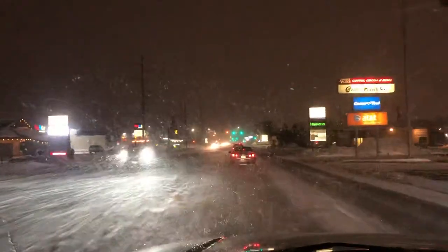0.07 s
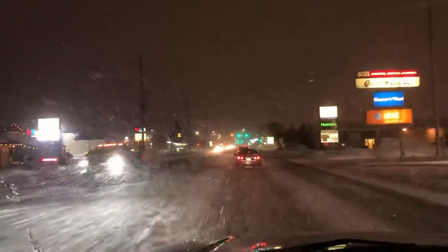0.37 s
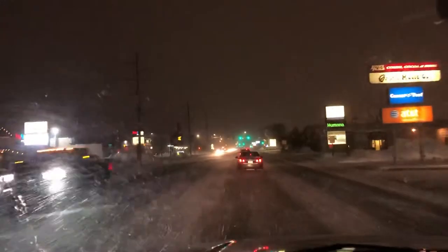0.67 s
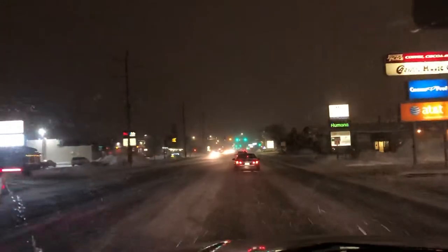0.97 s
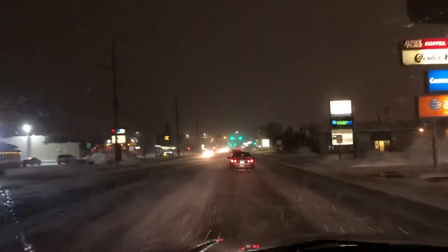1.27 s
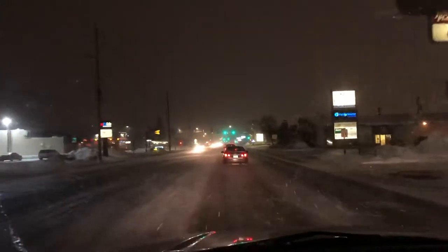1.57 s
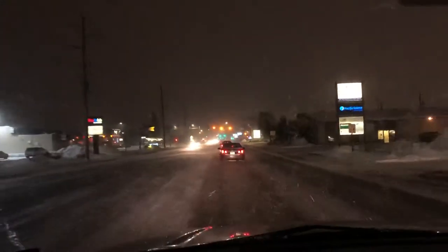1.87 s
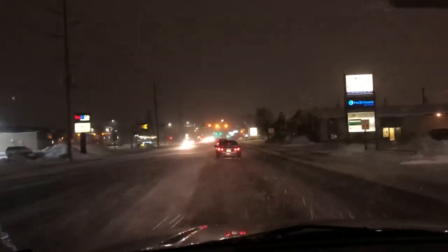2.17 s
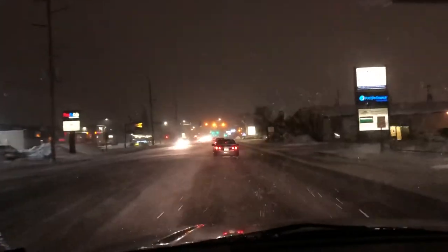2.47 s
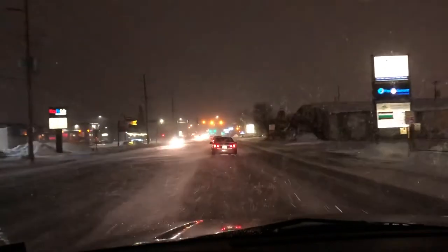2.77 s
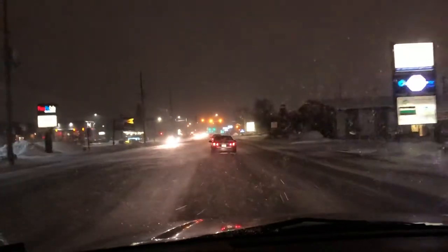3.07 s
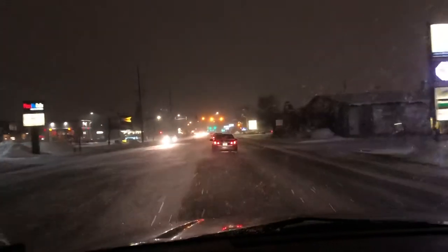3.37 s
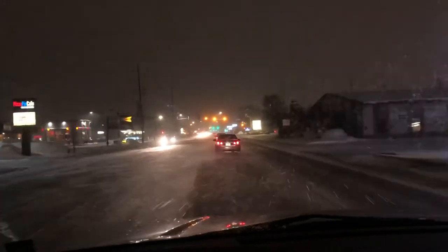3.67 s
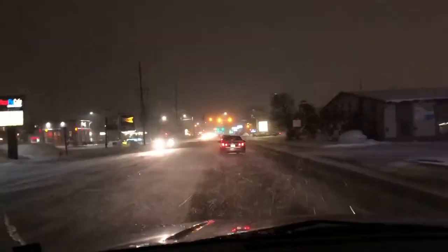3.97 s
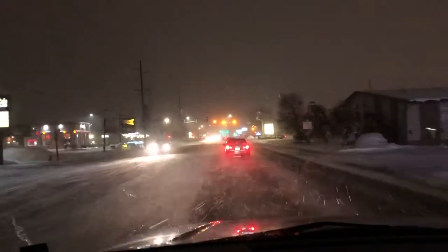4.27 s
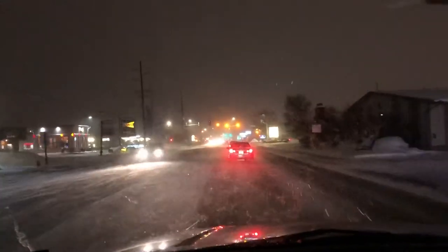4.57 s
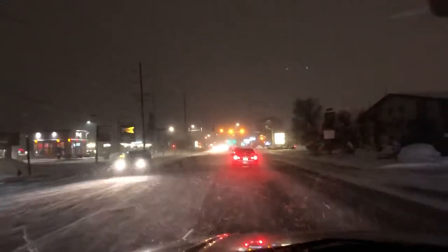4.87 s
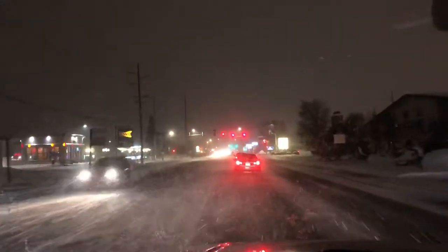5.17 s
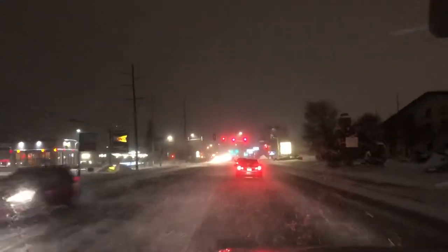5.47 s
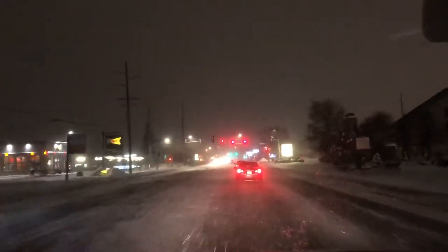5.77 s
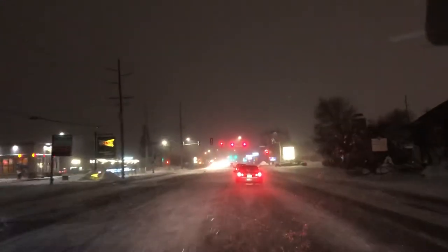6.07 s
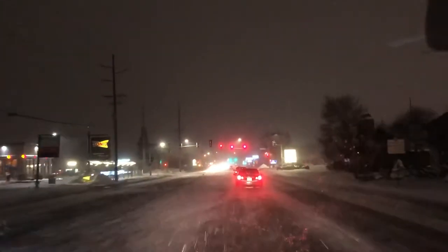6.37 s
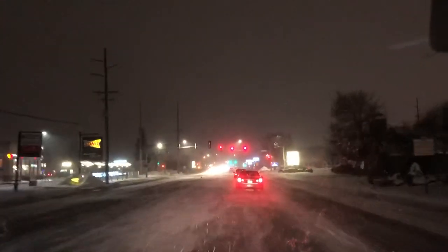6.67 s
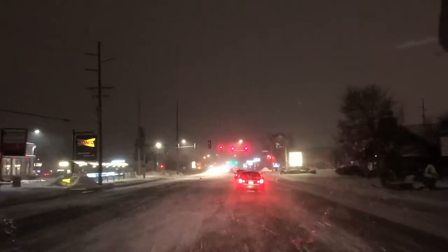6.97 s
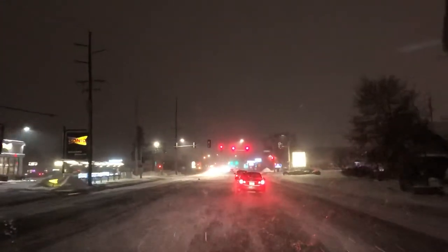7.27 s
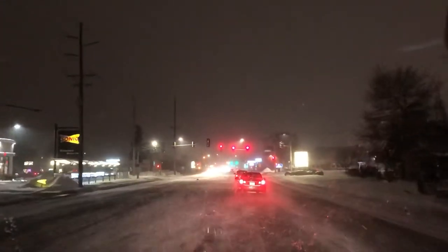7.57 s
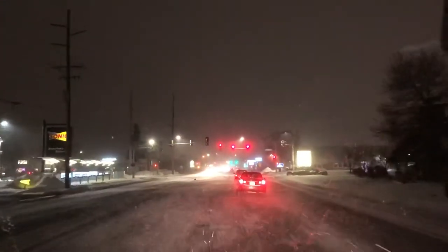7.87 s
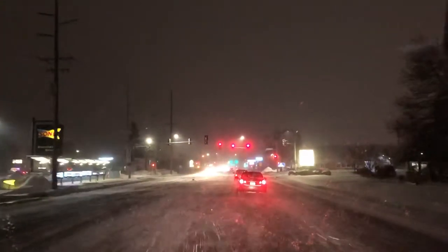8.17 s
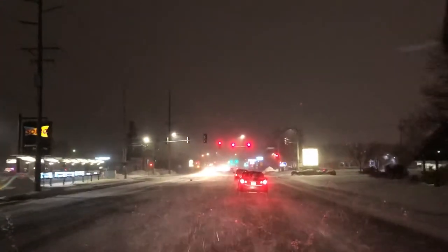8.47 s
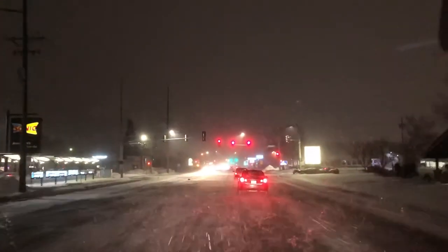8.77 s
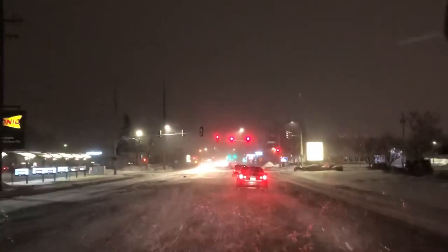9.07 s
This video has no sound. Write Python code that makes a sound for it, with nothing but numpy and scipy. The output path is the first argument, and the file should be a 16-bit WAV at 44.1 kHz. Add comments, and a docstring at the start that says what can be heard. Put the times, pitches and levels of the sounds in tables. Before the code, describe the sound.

Heard from the front seat of a moving car, the engine hums under a deep, slightly throbbing road rumble. Soft tyre noise and a quiet heater hiss sit behind it, while ruts in the snow make short, muffled booms. The car gradually slows without stopping, so the hum drops a little in pitch. Faint flicks of slush and tiny ticks of loose plastic grow more frequent near the end.

```python
"""Car cabin on a snowy road.

The car rolls along, then eases off for a red light. Engine and drivetrain drone; the uneven road
shakes the cabin's air modes and panels, and ruts set it booming. The tyres roar, the heater fan
hisses, slush sprays faintly against the body and loose trim ticks."""
import sys
import numpy as np
from scipy import signal
from scipy.fft import rfft, irfft
from scipy.io import wavfile
from scipy.ndimage import uniform_filter1d

SR = 44100
rng = np.random.default_rng(int(sys.argv[2]) if len(sys.argv) > 2 else 0)


def dump(signal):
    """Clip the signal to [-1, 1] and save it as 16-bit WAV at the path in sys.argv[1]."""
    limited = np.clip(np.atleast_2d(signal).T, -1, 1)
    pcm = np.round(limited * 32767).astype(np.int16)
    wavfile.write(sys.argv[1], SR, pcm)


N = 411453
T = np.arange(N) / SR
FREQS_HZ = np.maximum(np.fft.rfftfreq(N, 1 / SR), 1)

# road speed (time [s], share of top speed)
ROAD_SPEED = [(0, 0.97), (1.5, 0.97), (2, 1), (2.8, 1.0), (4.4, 1), (5.8, .91), (7, 0.83), (9.33, 0.76)]
# engine note and upper drivetrain drone (time [s], pitch [Hz], level [dB])
ENGINE_TRACK = [(0, 83.9, -37.5), (.4, 85.4, -29.5), (1.4, 94.4, -36.5), (1.8, 103.6, -38),
                (2.3, 108.6, -33.5), (3.1, 91.98, -37), (3.78, 88.05, -28), (4.05, 88.1, -47),
                (4.72, 90, -32), (5.1, 88.1, -43.5), (5.8, 88.1, -33.5), (6.4, 90.03, -37),
                (6.6, 90.26, -25), (6.9, 90.1, -45), (7.55, 91.5, -32.5), (8.05, 87.3, -35.5),
                (8.25, 80.8, -40), (8.5, 76.9, -34), (9.33, 74, -31)]
DRIVETRAIN_TRACK = [(0, 136.5, -43.5), (.55, 142.8, -34.5), (1.3, 151, -32), (1.5, 148.9, -48),
                    (1.65, 138.1, -36), (2.05, 147, -27.5), (2.35, 151.1, -37.5), (2.65, 146.3, -29.5),
                    (2.9, 144.4, -45), (3.75, 141.7, -34), (4.05, 140, -47), (5.1, 130, -45),
                    (6, 137.1, -32.5), (6.6, 130.1, -40), (7, 128, -45.5), (9.33, 120, -40)]
# wheel hums at top speed (pitch [Hz], level [dB])
WHEEL_HUMS = [(116, -40), (127, -35)]
# resonances (frequency [Hz], nominal width [Hz], relative level [dB])
CABIN_AIR_MODES = [(33, 10, -8.5), (43.4, 9.9, -9), (56.5, 14, -9), (69.6, 8.8, -6.5), (75.8, 17.4, -4),
                   (89.3, 10.4, -3)]
BODY_PANEL_MODES = [(115.2, 11.5, 3), (131.3, 6.7, 0), (138.2, 23, 0.5), (148, 15, -3.5), (162, 16, -10.5),
                    (183, 24, -15.5)]
TREAD_MODES = [(457, 13, -11), (529.5, 35, -9), (605, 26, -11.5), (742, 116, -12.5), (952, 96, -17),
               (1300, 120, -24)]
CARCASS_AND_WELL_MODES = [(188.7, 32, 2), (234.6, 53, -0.5), (294.2, 49, 0.5), (343, 33, -5), (380, 38, -3)]
HEATER_DUCT_MODES = [(1627, 40, 4), (1738, 49, 6), (1820, 56, -4), (2260, 120, -14), (3520, 140, -10),
                     (3590, 25, -11), (4020, 22, -6)]
# noise spectra in the cabin (frequency [Hz], relative density [dB])
TREAD_SPECTRUM = [(380, -10.5), (450, -11.5), (600, -14.5), (850, -16), (1130, -23.5), (1450, -24),
                  (2000, -32), (3500, -39)]
VENT_SPECTRUM = [(400, 1), (1000, 4.5), (1500, -1), (1950, 0), (2300, 1), (2900, -2), (3600, -2),
                 (4900, -7), (6500, -10.5), (9000, -14.5), (10000, -18.5), (13000, -21.5), (15500, -24)]
SLUSH_SPECTRUM = [(4000, 6), (6000, 7), (9000, 1.5), (12000, -2.5), (15500, -1.5)]
# ruts under the wheels (onset [s], boom peak [dB], boom pitch [Hz], rise [s])
RUTS = [(.2, -23, 81.5, 0.015), (1.535, -20, 95, 0.016), (1.93, -22, 93, 0.011), (3.2, -23.5, 80.6, 0.016),
        (3.275, -20.5, 81.1, 0.012), (3.775, -21, 85, .016), (4.025, -24, 83, .012),
        (4.22, -23.5, 110, .012), (4.53, -22, 81.5, 0.0099), (4.72, -20.5, 91, 0.017),
        (5.21, -23, 108, 0.011), (6.585, -20, 90.5, 0.026), (6.83, -24.5, 86.7, 0.013),
        (7.223, -24, 90.8, 0.0097), (7.905, -17.5, 87.3, 0.012), (8.025, -21.5, 80, 0.014),
        (8.099, -23.5, 81, .013), (8.38, -19.5, 81, 0.01), (8.618, -21.5, 79, .016), (8.89, -20, 76, 0.015)]
# larger slush sprays (peak time [s], relative level [dB], nominal half length [s], low edge [Hz])
SLUSH_SPRAYS = [(.525, -67, .045, 5000), (.774, -68, 0.0098, 10000), (.888, -66.5, .014, 8000),
                (1.352, -68, 0.011, 4005), (1.793, -68, .011, 10000), (1.907, -65, 0.011, 6000),
                (2.16, -66, .0092, 11000), (2.275, -65, .015, 8010), (2.743, -68, 0.011, 11020),
                (2.923, -70, .022, 8000), (3.135, -69, .02, 8000), (3.358, -68, .012, 4995),
                (3.608, -69, .012, 7010), (5.084, -66.5, 0.018, 6000), (5.141, -68, .015, 4000),
                (5.208, -66, .012, 4000), (5.516, -68, .014, 3993), (6.14, -64.5, 0.0071, 6000),
                (6.214, -66, 0.013, 6000), (6.369, -68, .011, 10000), (6.513, -65.5, 0.013, 3000),
                (7.338, -63.5, 0.022, 5980), (7.645, -63.5, .0096, 7000), (8.218, -68, 0.011, 8000),
                (8.313, -68, 0.011, 9000), (8.378, -64, 0.014, 4000), (8.468, -63, .012, 3000),
                (8.633, -68, .015, 4000), (8.76, -66, .035, 5000), (8.82, -67, .01, 7000),
                (8.884, -66.5, .02, 3000), (8.945, -67, 0.017, 3990), (9.067, -63, .0085, 3000),
                (9.135, -59.5, .026, 3990)]
# trim ticks (onset [s], pitch [Hz], relative level [dB], decay [s], nominal width / pitch)
TRIM_TICKS = [(3.101, 14000, -58, .004, .07), (3.099, 3800, -58, 0.0092, .5), (3.682, 5000, -58, .0093, .3),
              (4.358, 5480, -61.5, .008, .35), (4.36, 9910, -67, .009, 0.13), (7.082, 4380, -63, .04, 0.31),
              (7.335, 5170, -60, .011, .4), (8.425, 4500, -60, .014, .5), (8.503, 2894, -56, .009, .3),
              (8.87, 2500, -57, .016, .4), (9.112, 4600, -61, 0.023, .7)]


def undb(db):
    """Decibels to gain."""
    return 10 ** (np.asarray(db) / 20)


def unit(x):
    """Scale to rms 1."""
    return x / np.sqrt(np.mean(x ** 2))


def curve(rows):
    """Interpolate each column linearly over time."""
    times_s, *columns = np.transpose(rows)
    return [np.interp(T, times_s, column) for column in columns]


def noise(gain):
    """Spectrally shaped noise, rms 1."""
    return unit(irfft(rfft(rng.standard_normal(N)) * gain, N))


def colour(spectrum):
    """Gain through the spectrum's points, steep roll-off beyond both ends."""
    hz, db = np.transpose(spectrum)
    ends = np.minimum(FREQS_HZ / hz[0], 1) * np.minimum(hz[-1] / FREQS_HZ, 1)
    return undb(np.interp(np.log(FREQS_HZ), np.log(hz), db)) * ends ** 3


def resonances(modes, skirt):
    """Gain of independently driven modes; a larger skirt deepens the valleys."""
    power = 0
    for hz, width_hz, db in modes:
        detuning = (FREQS_HZ / hz - hz / FREQS_HZ) * hz / width_hz
        power += undb(db) ** 2 / (1 + detuning ** 2) ** skirt
    return np.sqrt(power)


def wander(rate_hz):
    """Random drift, rms 1."""
    return noise(1 / (1 + (FREQS_HZ / rate_hz) ** 4))


def speed():
    """Share of top speed over time."""
    return curve(ROAD_SPEED)[0]


def speed_level_db(top_db, db_per_decade):
    """Level that grows with road speed."""
    return top_db + db_per_decade * np.log10(speed())


def churn(time_s, start_s=8.39, rise_s=0.35):
    """Churned snow before the junction, 0 to 1."""
    return np.clip((time_s - start_s) / rise_s, 0, 1)


def drone(hz, db, drift_hz=0.3, drift_db=1.1):
    """One rotating order: a sine wavering in pitch and level with the load."""
    phase = 2 * np.pi * np.cumsum(hz + drift_hz * wander(6)) / SR
    return undb(db + drift_db * wander(6)) * unit(np.sin(phase))


def wheel_hum():
    """Two hums locked to the wheels, audible only near top speed."""
    return sum(drone(hz * speed(), speed_level_db(db, db_per_decade=398)) for hz, db in WHEEL_HUMS)


def road_rumble(modes, db, skirt, smooth_s=0.09):
    """Rough snow shakes a set of modes; random swells are levelled out."""
    shake = noise(resonances(modes, skirt))
    window = int(smooth_s * SR)
    power = uniform_filter1d(uniform_filter1d(shake ** 2, window), window)
    return shake / np.sqrt(power + 1e-12) * undb(db)


def wheel_throb(depth_db=1.4, top_turn_hz=10.5):
    """Rumble gain: snow-caked wheels thump once a turn."""
    turns = np.cumsum(top_turn_hz * speed()) / SR + rng.random()
    return undb(depth_db * np.cos(2 * np.pi * turns))


def tyres(roar_flutter_db=0.5, growl_flutter_db=0.46):
    """Tread roars on packed snow, carcasses growl; both sink with speed."""
    roar_db = speed_level_db(-47.5, db_per_decade=31) + roar_flutter_db * wander(17)
    growl_db = speed_level_db(-42.5, db_per_decade=26) - growl_flutter_db * wander(12)
    tread = noise(np.hypot(colour(TREAD_SPECTRUM), resonances(TREAD_MODES, skirt=1.23)))
    carcass = noise(resonances(CARCASS_AND_WELL_MODES, skirt=1.54))
    return tread * undb(roar_db) + carcass * undb(growl_db)


def heater(fan_db=-58, duct_relative_db=-7.5, flutter_db=0.67, ripple_db=1.8, ripple_corner_hz=12000):
    """The fan hisses and rings its ducts; reflections off the glass ripple the spectrum."""
    knots_hz = np.arange(0, SR, 45)
    depth_db = ripple_db / np.hypot(1, FREQS_HZ / ripple_corner_hz)
    ripple = undb(depth_db * np.interp(FREQS_HZ, knots_hz, rng.standard_normal(len(knots_hz))))
    vents = noise(colour(VENT_SPECTRUM) * ripple)
    ducts = noise(resonances(HEATER_DUCT_MODES, skirt=1.3)) * undb(duct_relative_db)
    return (vents + ducts) * undb(fan_db + flutter_db * wander(15))


def flecks(base_per_s=3, churn_extra_per_s=6, relative_db=-74, scatter_db=2.5, half_s=0.009, low_hz=8000):
    """Small random splashes, denser in churned snow; rows as in SLUSH_SPRAYS."""
    candidates = 100
    positions, odds, sizes = rng.random((candidates, 3)).T
    times_s = positions * T[-1]
    levels_db = relative_db + scatter_db * (2 * sizes - 1)
    lands = odds < (base_per_s + churn_extra_per_s * churn(times_s)) * T[-1] / candidates
    return [(peak_s, db, half_s, low_hz) for peak_s, db in zip(times_s[lands], levels_db[lands])]


def slush(spatter_db=-84, churn_db=7, patchy_db=3, grain_db=2.5, spray_offset_db=-1.5):
    """Slush hits the body: thin, patchy spatter under bright, grainy sprays."""
    out = noise(colour(SLUSH_SPECTRUM)) * undb(spatter_db + churn_db * churn(T) + patchy_db * wander(17))
    grains = noise(colour(SLUSH_SPECTRUM)) * undb(grain_db * wander(500))
    for peak_s, db, half_s, low_hz in list(SLUSH_SPRAYS) + flecks():
        near = np.abs(T - peak_s) < 4 * half_s
        age_s = T[near] - peak_s
        sigma_s = half_s * np.where(age_s < 0, 0.75, 0.95)  # rise faster than fall
        envelope = np.exp(-0.5 * (age_s / sigma_s) ** 2)
        highpass = signal.butter(2, low_hz, "highpass", fs=SR, output="sos")
        spray = unit(signal.sosfilt(highpass, grains[near]))
        out[near] += spray * undb(db + spray_offset_db) * envelope
    return out


def ruts(heave_relative_db=-11, heave_hz=40):
    """Each rut booms the cabin for a few cycles over a deeper chassis heave."""
    out = np.zeros(N)
    age_s = T[:SR // 2]
    for onset_s, db, boom_hz, rise_s in RUTS:
        boom = np.sin(2 * np.pi * (boom_hz * age_s + rng.random()))
        heave = undb(heave_relative_db) * np.sin(2 * np.pi * (heave_hz * age_s + rng.random()))
        envelope = age_s / rise_s * np.exp(1 - age_s / rise_s)
        out += np.interp(T - onset_s, age_s, (boom + heave) * envelope, left=0, right=0) * undb(db)
    return out


def trim_ticks(offset_db=1):
    """Loose plastic trim ticks, each piece in its own band."""
    out = np.zeros(N)
    for onset_s, hz, db, decay_s, width_ratio in TRIM_TICKS:
        age_s = np.maximum(T - onset_s, 0)
        envelope = (T > onset_s) * np.exp(-np.minimum(age_s / decay_s, 50))
        band = noise(resonances([(hz, width_ratio * hz, 0)], skirt=1.8))
        out += band * undb(db + offset_db) * envelope
    return out


def scene(shake_db=-32, churn_db=1):
    """Mono mix at the front seat."""
    engine = drone(*curve(ENGINE_TRACK))
    drivetrain = drone(*curve(DRIVETRAIN_TRACK))
    hum = engine + drivetrain + wheel_hum()
    cabin = road_rumble(CABIN_AIR_MODES, shake_db + churn_db * churn(T), skirt=1.525)
    panels = road_rumble(BODY_PANEL_MODES, speed_level_db(-33, db_per_decade=32.5), skirt=1.412)
    rumble = (cabin + panels) * wheel_throb()
    return (hum + rumble + ruts() + tyres() + heater() + slush() + trim_ticks())[None]


def record(dry, low_hz=25, top_hz=15650, fade_s=0.004):
    """Cut the deepest bass, fade both ends, cut the top."""
    highpass = signal.butter(6, low_hz, "highpass", fs=SR, output="sos")
    lowpass = signal.ellip(12, 0.1, 80, top_hz, fs=SR, output="sos")
    fade = np.minimum(np.minimum(T, T[-1] - T) / fade_s, 1)
    return signal.sosfilt(lowpass, signal.sosfilt(highpass, dry) * fade)


dry = scene()
out = record(dry)
dump(out)
```